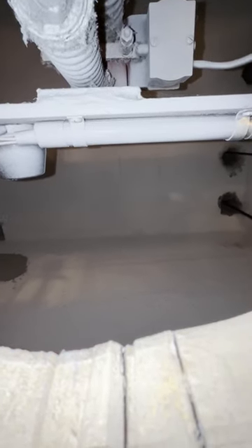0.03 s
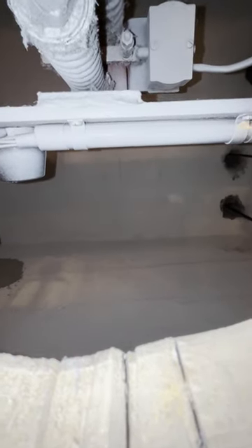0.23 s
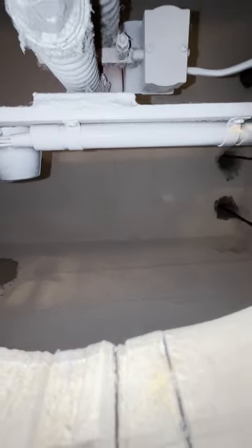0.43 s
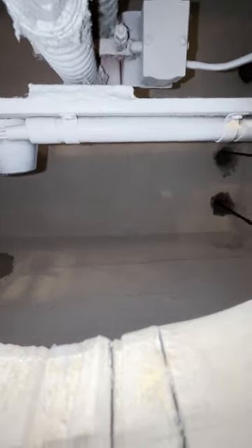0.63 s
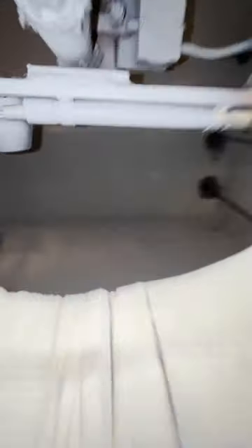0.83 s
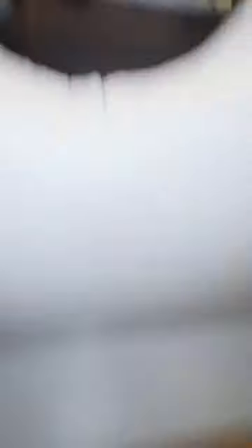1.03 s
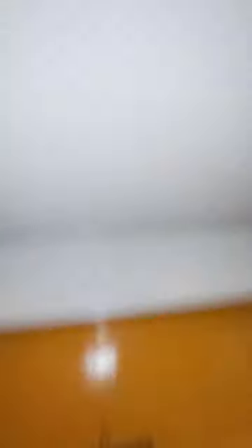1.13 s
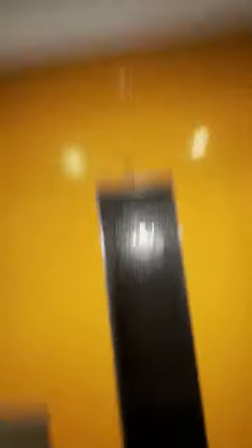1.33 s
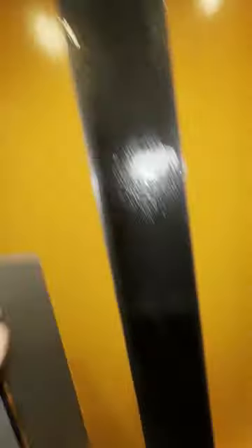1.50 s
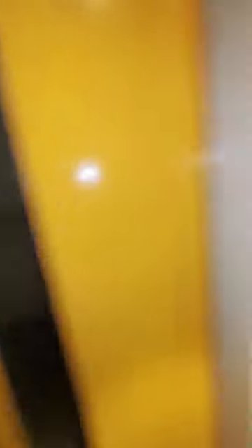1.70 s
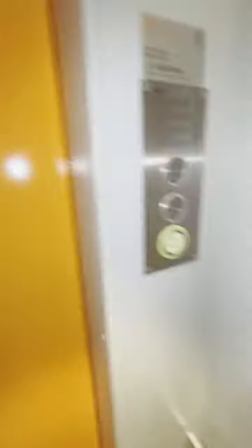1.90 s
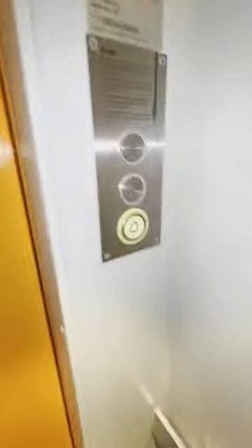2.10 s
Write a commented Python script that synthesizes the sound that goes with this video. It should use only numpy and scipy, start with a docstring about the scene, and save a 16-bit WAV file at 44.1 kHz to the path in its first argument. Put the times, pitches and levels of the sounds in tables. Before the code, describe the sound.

Inside an elevator, faint rumble gives way to a quick cluster of heavy low booms and metallic rattles within the first half second; afterwards soft hiss, scuffs and sharper knocks near the handheld stereo microphone.

```python
"""A faint rumble of machinery comes first, inside a lift cabin, heard by a phone held by hand.
A metal part rattles, then heavy thumps set the cabin panels booming at low notes that beat and die away.
Short knocks and scuffs join in. Machinery, scuffs and rattles use coloured noise; panels and struck metal
are fading sine waves. The boom reaches the right microphone first and much louder."""
import sys
import numpy as np
from scipy import signal
from scipy.fft import rfft, irfft
from scipy.io import wavfile
from scipy.ndimage import uniform_filter1d, map_coordinates

SR = 44100
rng = np.random.default_rng(int(sys.argv[2]) if len(sys.argv) > 2 else 0)


def file_out(sig):
    """Save sig as 16-bit WAV at sys.argv[1]."""
    # one column per channel
    cols = np.atleast_2d(sig).T
    # limit, then scale
    lim = np.clip(cols, -1, 1)
    pcm = np.round(lim * 32767).astype(np.int16)
    wavfile.write(sys.argv[1], SR, pcm)


def linear_from_db(decibels):
    """Turn decibels (scalar or array-like) into linear amplitude factors; 0 gives 1."""
    return 10 ** (np.asarray(decibels, float) / 20)


N = 94815  # length in samples


def unit(x):
    """Scale to an average (rms) strength of 1."""
    return x / np.sqrt(np.mean(x ** 2) + 1e-20)


def along(points, hz):
    """Read a curve of (Hz, value) points, with pitch on a log axis."""
    point_hz, value = np.transpose(points)
    return np.interp(np.log(hz + 1), np.log(point_hz + 1), value)


def curves(rows):
    """One value per sample for each column after the time."""
    start_s, *columns = np.transpose(rows)
    return [np.interp(np.arange(N) / SR, start_s, column) for column in columns]


def wobble(rate):
    """A smooth curve through random points, rate points a second."""
    points = rng.standard_normal(int(N * rate / SR) + 4)
    return map_coordinates(points, [np.arange(N) * rate / SR])


def noise(gain, patchy_db, size=N):
    """Stereo noise of rms 1 with louder and softer patches in time and pitch; gain(hz) is its colour."""
    # how alike the two microphones are: pitch_hz, likeness (-1 to 1)
    mic_likeness = [(200, 0.27), (600, -0.43), (1400, -0.07), (14000, -0.14)]
    # balance of the two microphones: pitch_hz, left_minus_right_db
    mic_balance = [(200, -2.5), (2400, 1.5), (4400, 8.5), (8500, -3.5), (14000, -3.5)]
    grains = signal.stft(rng.standard_normal((2, size + 1024)), nperseg=512)[2]
    patches = rng.standard_normal(grains.shape[1:])
    patches = uniform_filter1d(uniform_filter1d(patches, 4, 0), 6, 1)
    pair = signal.istft(grains * linear_from_db(patchy_db * unit(patches)), nperseg=512)[1]
    hz = np.fft.rfftfreq(pair.shape[1], 1 / SR)
    # blend a shared and an opposed noise to get the wanted likeness
    angle = np.arccos(np.clip(along(mic_likeness, hz), -1, 1)) / 2
    shared, opposed = rfft(pair) * gain(hz) * [np.cos(angle), np.sin(angle)]
    half_db = along(mic_balance, hz) / 2
    left = (shared + opposed) * linear_from_db(half_db)
    right = (shared - opposed) * linear_from_db(-half_db)
    return unit(irfft([left, right], pair.shape[1])[:, :size])


def burst(start_s, level_db, rise_s, hold_s, t60_s, gain):
    """Noise that rises, holds, then falls 60 dB per t60_s; it lasts half a second at most."""
    out, first = np.zeros((2, N)), round(start_s * SR)
    t = np.arange(min(N - first, SR // 2)) / SR
    fall_db = 60 * np.maximum(t - rise_s - hold_s, 0) / t60_s
    shape = np.clip(t / rise_s, 0, 1) * linear_from_db(level_db - fall_db)
    out[:, first:first + len(t)] = shape * noise(gain, patchy_db=2.5, size=len(t))
    return out


def machinery():
    """Rumble, a middle roar and hiss are coloured noise; the hum is a gliding tone blurred by random wavering."""
    # loudness of the noises over time: start_s, hiss_db, middle_db, rumble_db
    machine_levels = [(0, -87, -56.5, -44.5), (.078, -70, -71, -38), (.095, -50.5, -54.5, -46),
                      (.3, -50, -43.5, -21.5), (.5, -56.5, -49, -29.5), (.59, -67, -71, -70),
                      (.68, -59.5, -58, -51), (.95, -50.5, -54, -51), (1.1, -50, -65, -47),
                      (1.3, -46, -48.5, -50.5), (1.62, -47.5, -45.5, -41.5), (1.88, -53.5, -54.5, -46),
                      (2.05, -50, -41, -39), (2.15, -56, -49, -48)]
    # colours of the three noises: pitch_hz, relative_level_db (per Hz)
    hiss_colour = [(1060, -6), (1800, -6), (3620, -9.5), (9240, -14), (11400, -19), (12800, -59),
                   (14300, -21), (15800, -32.5)]
    middle_colour = [(120, -56), (270, -2.5), (484, -1.5), (1060, -11), (1890, -16.5), (3120, -39.5),
                     (5280, -120)]
    rumble_colour = [(18, -44), (30, -0.5), (75, 10), (118, -11.5), (151, -4), (260, -20.5), (570, -120)]
    # path of the hum: start_s, pitch_hz, level_db
    hum_path = [(0, 298, -53.5), (.45, 296.8, -48.5), (.8, 346.7, -55.5), (1.3, 339, -54.5),
                (1.5, 335.4, -72.5), (2.15, 355.2, -46.5)]
    hum_rate = 24  # random points a second; more blurs the pitch wider

    hiss_db, middle_db, rumble_db = curves(machine_levels)
    middle_db = middle_db + 0.26 * wobble(10.14)
    rumble_db = rumble_db + 1.5 * wobble(6)
    hiss = linear_from_db(hiss_db) * noise(lambda f: linear_from_db(along(hiss_colour, f)), patchy_db=3.0)
    middle = linear_from_db(middle_db) * noise(lambda f: linear_from_db(along(middle_colour, f)), patchy_db=3.5)
    rumble = linear_from_db(rumble_db) * noise(lambda f: linear_from_db(along(rumble_colour, f)), patchy_db=1.5)

    hum_hz, hum_db = curves(hum_path)
    phase = 2 * np.pi * np.cumsum(hum_hz) / SR
    # each microphone gets its own wavering
    hum = [wobble(hum_rate) * np.cos(phase) + wobble(hum_rate) * np.sin(phase) for _ in "LR"]
    return hiss + middle + rumble + linear_from_db(hum_db) * np.array(hum)


def rattles():
    """A loose metal part is struck, rings, and buzzes on in its narrow resonances, most near one pitch."""
    # resonances of the metal: pitch_hz, width_hz, relative_level_db
    metal = [(489, 24, -0.5), (630, 63, 3.5), (856, 130, -9), (1163, 260, -6.5), (1668, 93, -12),
             (1924, 105, -11), (3970, 87, -4), (4518, 100, -8.5), (4800, 130, -9.5), (5935, 50, -8)]
    # each rattle: start_s, level_db, hold_s, t60_s (time to fall 60 dB), favoured_hz
    rattle_times = [(0.093, -54.5, 0.07, .25, 4450), (0.16, -59.5, 0.14, 0.27, 6100),
                    (.18, -54.5, 0.066, .1, 3760), (0.312, -43, 0.019, 0.082, 1320),
                    (.366, -42, 0.0054, .05, 950), (.432, -42, 0.015, 0.15, 1254),
                    (.572, -54, 0.049, 0.23, 740), (0.81, -44.5, 0.024, 0.42, 1150),
                    (1.33, -48.5, 0.13, 1, 2120), (1.53, -46.5, 0.11, 0.2, 386),
                    (1.924, -43.5, 0.0073, 0.13, 1720), (2.002, -40.5, 0.031, 0.13, 5280),
                    (2.003, -45, 0.034, .12, 1800)]
    favour_db = 12  # loss 1 kHz away from the favoured pitch

    def near(hz, favoured_hz):
        return linear_from_db(-favour_db * ((hz - favoured_hz) / 1000) ** 2)

    def ring(hz):
        return sum(linear_from_db(level_db) * width_hz ** 2 / (width_hz ** 2 + 4 * (hz - pitch_hz) ** 2)
                   for pitch_hz, width_hz, level_db in metal)

    out = np.zeros((2, N))
    for start_s, rattle_db, hold_s, t60_s, favoured_hz in rattle_times:
        t = np.maximum(np.arange(N) / SR - start_s, 0)
        blow = np.zeros(N)
        for pitch_hz, width_hz, level_db in metal:
            # a wider resonance dies sooner
            tone = np.exp(-np.pi * width_hz * t) * np.sin(2 * np.pi * pitch_hz * t)
            blow += linear_from_db(level_db) * near(pitch_hz, favoured_hz) * tone
        out += linear_from_db(rattle_db) * blow / np.abs(blow).max()
        out += burst(start_s, rattle_db, 0.0039, hold_s, t60_s, lambda f: ring(f) * near(f, favoured_hz))
    return out


def boom():
    """Each thump rings the panels as fading sine waves and shakes a short noisy clatter out of the fittings."""
    # thumps on the cabin: start_s, level_db, extra_for_deep_notes_db,
    # ring_share (multiplies the panel t60_s), clatter_db
    thumps = [(.14, -32, 9, 0.47, -44), (0.196, -11.5, 4, 0.25, -36), (.277, -13.5, -9.5, 0.38, -54),
              (0.336, -14, 3, 0.11, -44.5), (0.435, -9.5, 9.5, 0.1, -35.5), (.462, -8.5, 8, 0.14, -36.5),
              (0.499, -16, -23, 0.73, -49), (.63, -35.5, 16, 0.66, -47), (0.943, -40, 15, 0.51, -63)]
    # notes of the panels: pitch_hz, relative_level_db, t60_s (before ring_share), left_minus_right_db
    panel_notes = [(54.3, -6, 1.13, -8), (65.2, 1.5, 1.3, -17), (95.95, 5, 1.54, -13.5),
                   (121.5, -14.5, 1.34, -3), (162, -21.5, 1.6, -16), (93, -8, 2.49, -5),
                   (255, -24.5, 0.43, -8)]
    deep_below_hz = 80
    attack_s, left_lag_s = 0.0089, 0.0004
    drift_rad, waver_db = 1, 4  # sizes of the random drift (at 80 Hz) and of the level waver
    clatter_hz, clatter_width_hz = 236, 240
    clatter_rise_s, clatter_t60_s = 0.0058, 0.51

    def clatter_colour(hz):
        """One broad resonance."""
        across = (hz * clatter_width_hz) ** 2
        return across / ((clatter_hz ** 2 - hz ** 2) ** 2 + across)

    out = np.zeros((2, N))
    # a note keeps the same drift and waver through all thumps
    drifts = [(drift_rad * wobble(7), waver_db * wobble(8.66)) for _ in panel_notes]
    lag_s = np.array([[left_lag_s], [0]])
    for start_s, thump_db, deep_db, ring_share, clatter_db in thumps:
        t = np.maximum(np.arange(N) / SR - start_s - lag_s, 0)
        attack = (1 - np.exp(-t / attack_s)) ** 2
        for (pitch_hz, note_db, t60_s, left_db), (drift, waver) in zip(panel_notes, drifts):
            level_db = thump_db + note_db + deep_db * (pitch_hz < deep_below_hz)
            level_db = level_db + np.array([[left_db], [0]]) - 60 * t / (t60_s * ring_share)
            level_db = level_db + waver * np.minimum(t / t60_s * 4, 1)  # waver grows in after the blow
            phase = 2 * np.pi * pitch_hz * t + drift * pitch_hz / deep_below_hz
            out += linear_from_db(level_db) * attack * np.sin(phase)
        out += burst(start_s, clatter_db, clatter_rise_s, 0, clatter_t60_s, clatter_colour)
    return out


def tilted(hz, db):
    """Gain that leans by db per octave above 410 Hz, flat below, and is 1 at 2000 Hz."""
    return linear_from_db(db * np.log2(np.maximum(hz, 410) / 2000))


def knocks():
    """Hand and phone against hard surfaces: noise bursts with a fading tail for the small cabin's smear."""
    # knocks and scuffs: start_s, level_db, rise_s, t60_s (time to fall 60 dB), tilt_db (per octave)
    knock_times = [(.253, -48.5, 0.00067, 0.17, 11), (0.81, -44, 0.0027, 0.29, -1.5),
                   (.92, -48.5, 0.045, 0.33, 3.5), (.992, -39.5, 0.0075, .12, 0),
                   (1.735, -39, 0.0061, 0.17, 2.5), (1.924, -33, 0.00094, 0.28, -0.5),
                   (2.002, -37.5, 0.0026, 0.22, 0)]
    # colour before the tilt: pitch_hz, relative_level_db (per Hz)
    knock_colour = [(88, -38), (150, -2.5), (1250, -4.5), (2390, -11), (8810, -22), (11800, -31.5),
                    (12900, -61), (15800, -31)]
    out = np.zeros((2, N))
    for start_s, level_db, rise_s, t60_s, tilt_db in knock_times:
        out += burst(start_s, level_db, rise_s, 0.016, t60_s,
                     lambda f: linear_from_db(along(knock_colour, f)) * tilted(f, tilt_db))
    return out


def scene():
    """All sources added together at the two microphones."""
    return machinery() + rattles() + boom() + knocks()


def top_cut(x):
    """Nothing passes above the cut-off."""
    return signal.sosfilt(signal.butter(12, 16480, fs=SR, output="sos"), x)


def record(dry):
    """The phone weakens the deepest bass and keeps nothing above its band limit."""
    bass_hz, top_hz = 36.5, 15830
    hz = np.fft.rfftfreq(N, 1 / SR)
    bass_cut = 1 / (1 + (bass_hz / (hz + 1)) ** 4)
    kept = irfft(rfft(dry) * (hz < top_hz) * bass_cut, N)
    return top_cut(kept)


dry = scene()
out = record(dry)
file_out(out)
```